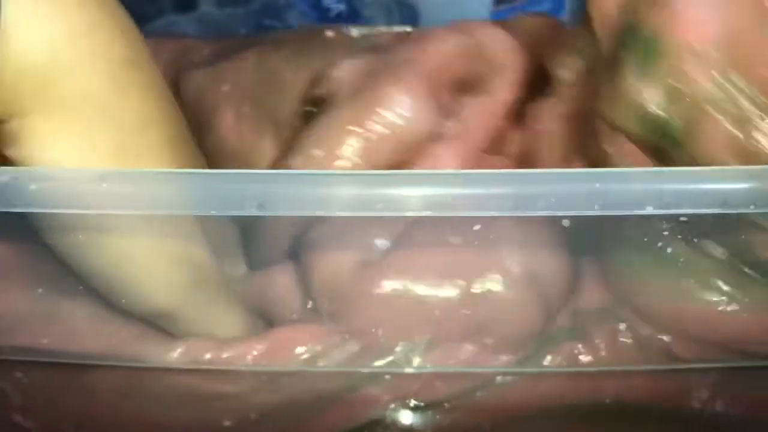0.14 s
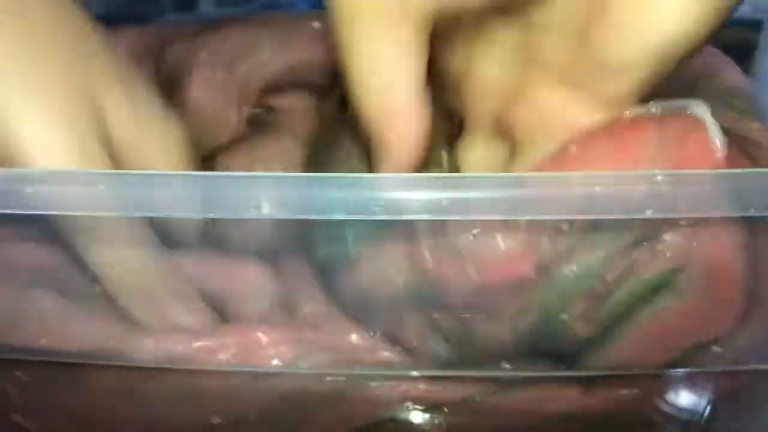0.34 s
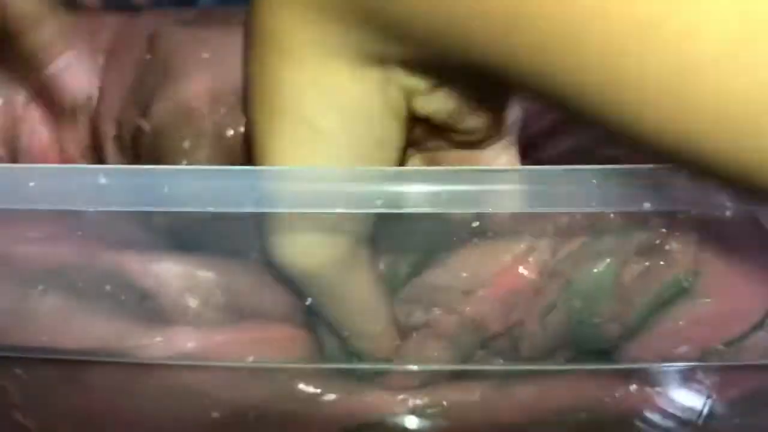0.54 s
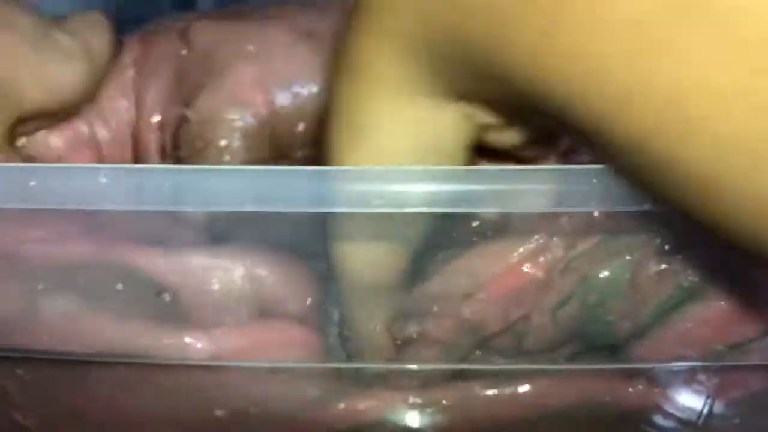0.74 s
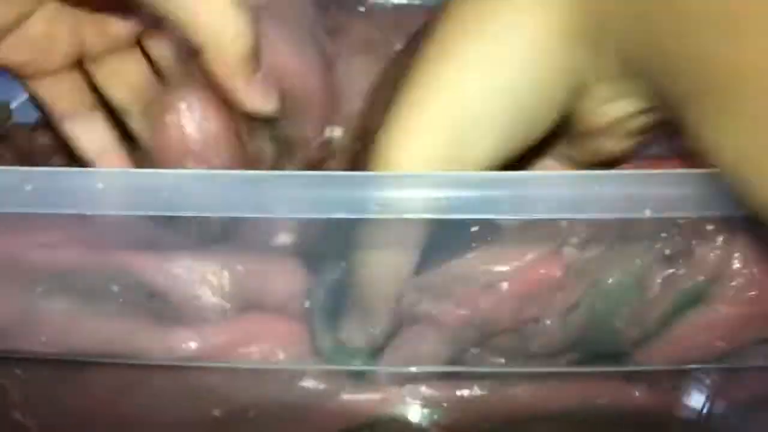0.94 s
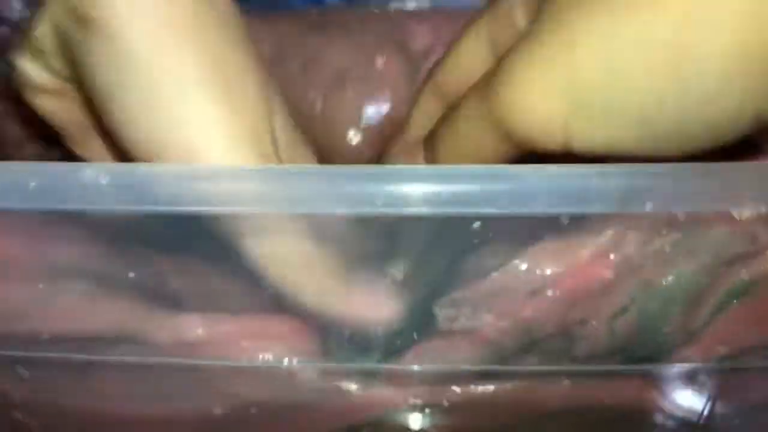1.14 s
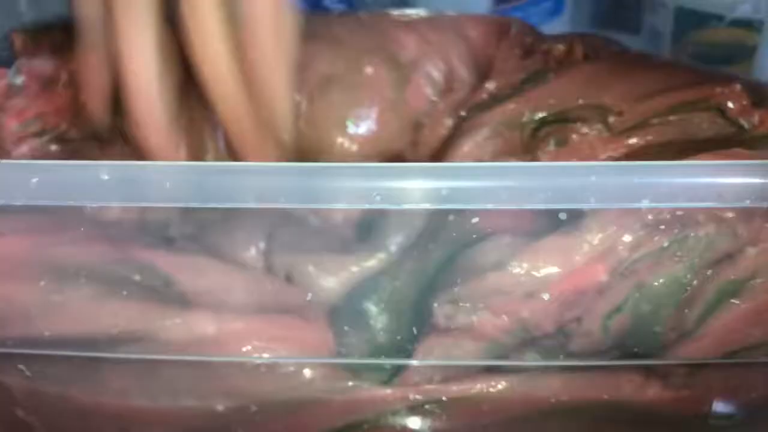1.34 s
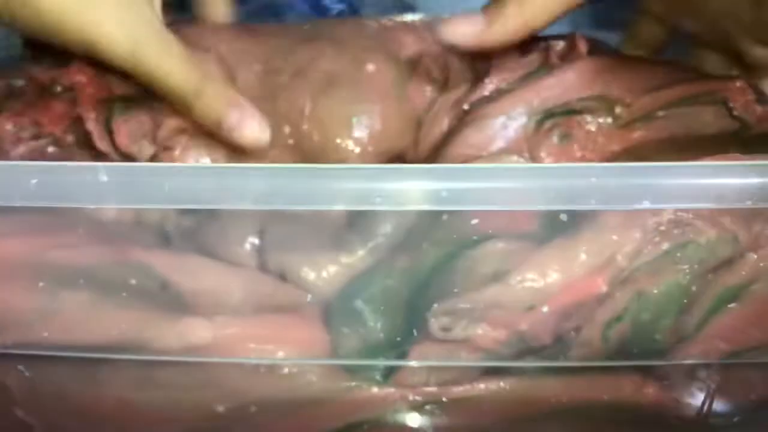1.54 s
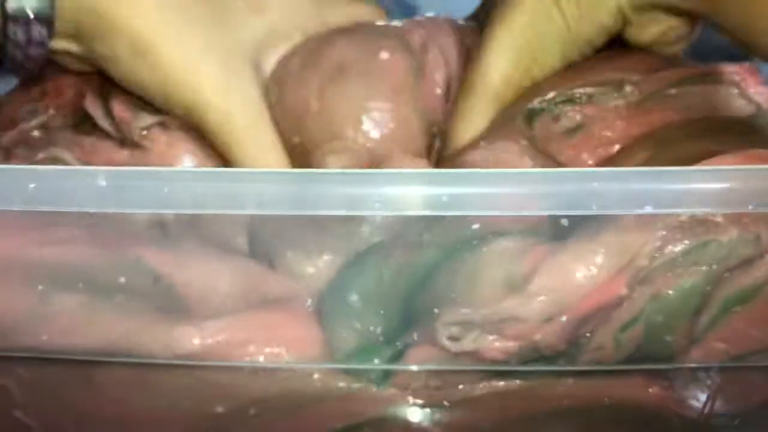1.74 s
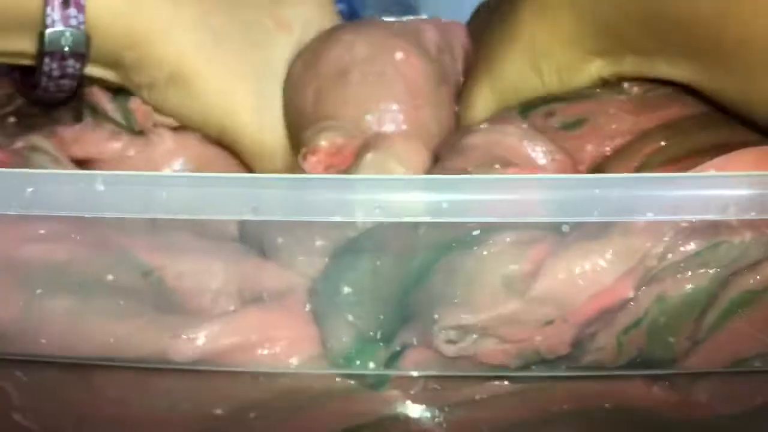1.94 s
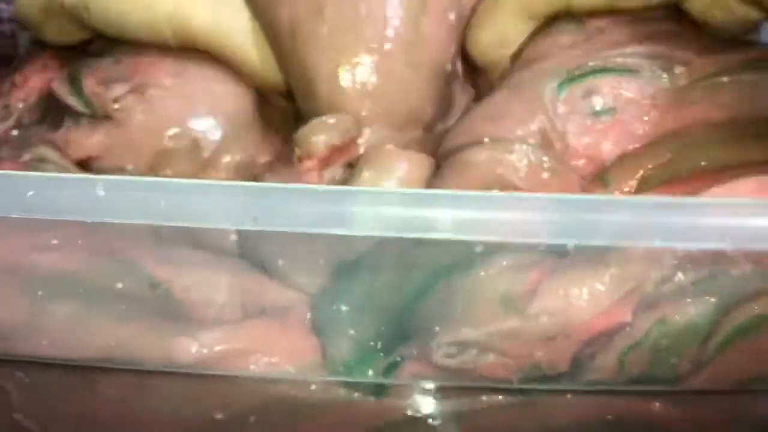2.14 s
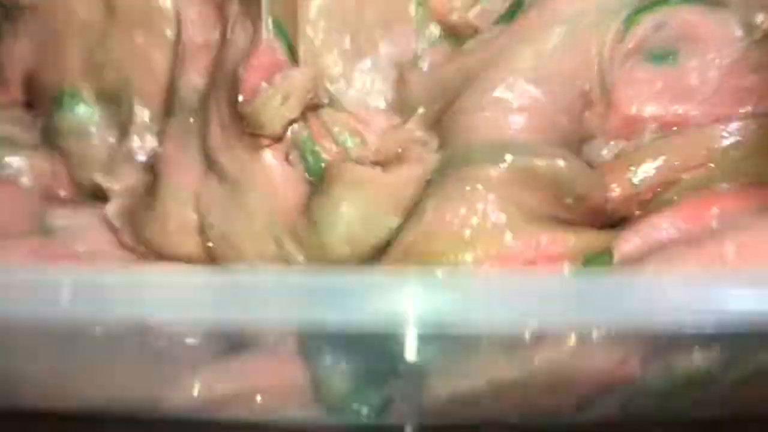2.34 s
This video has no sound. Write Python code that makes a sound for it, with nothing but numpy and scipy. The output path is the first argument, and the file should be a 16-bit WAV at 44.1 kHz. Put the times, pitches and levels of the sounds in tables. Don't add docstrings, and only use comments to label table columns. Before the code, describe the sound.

Wet slime squelches and crackles as hands knead it in a plastic tub, with sharp pops

```python
import sys
import numpy as np
from scipy import signal
from scipy.fft import rfft, irfft
from scipy.io import wavfile
from scipy.ndimage import uniform_filter1d

SR = 44100
rng = np.random.default_rng(int(sys.argv[2]) if len(sys.argv) > 2 else 0)


def master(y):
    cut = np.clip(np.atleast_2d(y).T, -1, 1)
    pcm = np.round(cut * 32767)
    wavfile.write(sys.argv[1], SR, pcm.astype(np.int16))


def decibels_to_gain(level_db):
    exponent = np.asarray(level_db, float) / 20
    return 10 ** exponent


N = 105840


def unit(x):
    return x / np.sqrt(np.mean(x ** 2))


def band(x, hz, width_hz):
    return signal.lfilter(*signal.iirpeak(min(hz, 0.45 * SR), hz / width_hz, fs=SR), x)


def shape_db(table, hz):
    table_hz, table_db = np.array(table).T
    return np.interp(np.log(hz), np.log(table_hz), table_db)


def walk(rate):
    hold = int(SR / rate)
    steps = np.repeat(rng.standard_normal(N // hold + 1), hold)
    smooth = uniform_filter1d(uniform_filter1d(steps, hold), hold)
    return unit(smooth[:N])


def add(out, s, sound):
    i = int(s * SR)
    out[i:i + len(sound)] += sound[:N - i]


# (frequency [Hz], level [dB])
ROOM_TONE = [(18, -60), (30, -35), (170, -2.5), (233, -2), (889, -8), (1190, -18.5), (2540, -20),
             (6900, -22), (16000, -31)]
# (time [s], level [dB])
SHUDDER = [(0, -49.5), (.08, -57.5), (.13, -68), (.33, -62.5), (.4, -74), (.45, -56), (.6, -61.5),
           (.77, -66), (1.18, -64.5), (1.29, -63), (1.46, -58.5), (1.64, -72.5), (1.69, -60), (1.8, -68),
           (2.08, -74.5), (2.13, -60), (2.31, -76)]
ROOM_TONE_DB = -64
SHUDDER_HZ = 117.8


def air():
    hz = np.maximum(np.arange(N // 2 + 1) * SR / N, 1)
    spectrum = rfft(rng.standard_normal(N)) * decibels_to_gain(shape_db(ROOM_TONE, hz))
    tone = unit(irfft(spectrum, N)) * decibels_to_gain(ROOM_TONE_DB + walk(9.4))
    shudder = band(band(rng.standard_normal(N), SHUDDER_HZ, 40), SHUDDER_HZ, 67)
    level_db = np.interp(np.arange(N) / SR, *np.array(SHUDDER).T)
    return tone + unit(shudder) * decibels_to_gain(level_db)


# (start [s], length [s], crackle level [dB], hollow level [dB])
SQUEEZES = [(0, 0.054, -52.5, -50.5), (0.092, 0.23, -52.5, -61.5), (0.18, 0.11, -48.5, -54.5),
            (0.384, 0.042, -44.5, -49.5), (0.417, 0.05, -36.5, -44), (0.478, 0.042, -68, -51.5),
            (.578, 0.022, -56, -60), (0.73, 0.18, -46, -58), (0.866, 0.037, -42, -48.5),
            (0.985, 0.13, -47.5, -57), (1.025, .12, -50, -47.5), (1.207, 0.049, -54, -50),
            (1.268, 0.043, -48, -46), (1.366, 0.023, -42.5, -39.5), (1.55, 0.091, -56.5, -63.5),
            (1.612, 0.039, -51.5, -52), (1.668, 0.079, -58, -65), (1.766, 0.081, -51, -56.5),
            (1.856, 0.032, -45.5, -61), (2.088, 0.088, -51.5, -54), (2.22, .105, -59, -53),
            (2.344, .035, -49, -63)]
ATTACK_S, RELEASE_S = 0.013, 0.011
SETTLE_DB, SETTLE_S = -40.5, 0.047


def effort(column):
    t, power = np.arange(N) / SR, np.zeros(N)
    for row in SQUEEZES:
        start, length = row[:2]
        attack = np.clip((t - start) / ATTACK_S, 0, 1) ** 3
        after = np.maximum(t - start - length, 0)
        release = np.exp(-after / RELEASE_S) + decibels_to_gain(SETTLE_DB) * np.exp(-after / SETTLE_S)
        power += decibels_to_gain(row[column]) ** 2 * attack * release
    return np.sqrt(power)


CRACKLES_PER_S, CRACKLE_SCATTER_DB, HISS_DB = 1300, 3.6, -3


def ticks(rate):
    chance, size, sign = rng.random((3, N))
    size = decibels_to_gain(-CRACKLE_SCATTER_DB * np.log(size + 0.06))
    hits = (chance < rate / SR) * size * np.sign(sign - 0.5)
    return unit(hits) + decibels_to_gain(HISS_DB) * rng.standard_normal(N)


# (frequency [Hz], level [dB])
SLIME = [(180, -37), (300, -19.5), (689, -12.5), (1140, 0), (3400, 0), (5080, -6), (6200, -1), (9090, -6.5),
         (16000, -1.5)]
FLUTTER_DB, CLUMP_DB = 2, 4


def crackle():
    broad, out = ticks(CRACKLES_PER_S / 3), 0
    for hz in 400 * 2 ** np.arange(0, 5.4, 0.5):
        clumps = decibels_to_gain(shape_db(SLIME, hz) + CLUMP_DB * walk(60))
        drive = 0.35 * broad + ticks(CRACKLES_PER_S / 4)
        out = out + clumps * band(band(drive, hz, hz / 2), hz, hz / 2)
    return unit(out) * effort(column=2) * decibels_to_gain(FLUTTER_DB * walk(120))


# (frequency [Hz], width [Hz], level [dB])
HOLLOW = [(638, 122, 7.5), (824, 460, -17), (524, 530, 2), (1120, 94, -17.5)]


def hollow():
    drive = ticks(CRACKLES_PER_S / 2)
    modes = sum(decibels_to_gain(db + FLUTTER_DB * walk(39.47)) * band(drive, hz, width) for hz, width, db in HOLLOW)
    return unit(modes) * effort(column=3)


# (time [s], pop level [dB], pitch [Hz], wall wave level [dB])
POPS_PULL = [(0.0213, -25, 1790, -29), (0.1267, -29, 4200, -64), (0.2249, -25, 2110, -30.5),
             (0.3383, -38.5, 2710, -77), (0.4525, -5, 7270, -65.5), (0.6673, -7.5, 4150, -24),
             (0.745, -24.5, 8350, -52), (0.8101, -24, 1720, -30), (1.0382, -18, 5830, -29.5),
             (1.072, -30, 3260, -24), (1.3444, -21.5, 3680, -21.5), (1.438, -62, 1480, -31.5),
             (1.5043, -17.5, 2700, -28), (1.5464, -18, 2300, -26.5), (1.5507, -24.5, 2770, -29),
             (1.555, -14.5, 2570, -31), (1.582, -19.5, 7700, -45), (1.6011, -31, 2470, -42),
             (1.6848, -39, 2170, -36.5), (1.7796, -17.5, 11300, -34), (1.792, -28, 1210, -32.5),
             (1.93, -24.5, 6500, -46), (2.0605, -34, 8040, -65)]
SNAP_DB, SNAP_TAIL_DB, RING_CYCLES = -5, -9.5, 1.4
WAVE_HZ, WAVE_BEND_S, WAVE_FADE_S = 3800, 0.00045, 0.0028
WAVE_DB, WAVE_ROUGH_DB = -2.5, 3.5


def snaps():
    out, t = np.zeros(N), np.arange(1500) / SR
    for s, db, hz, wall_db in POPS_PULL:
        noise = rng.standard_normal(1500)
        uneven = unit(uniform_filter1d(uniform_filter1d(noise[::-1], size=50), size=50))
        turns = WAVE_HZ * (1 + 0.176 * noise[2]) * WAVE_BEND_S * np.log1p(t / WAVE_BEND_S)
        wave = np.sin(2 * np.pi * turns + 0.5 * uneven) * decibels_to_gain(WAVE_ROUGH_DB * uneven)
        wave *= np.minimum(t / 0.0012, 1) * np.exp(-t / WAVE_FADE_S)
        ring = np.sin(2 * np.pi * hz * t) * np.exp(-t * np.sqrt(hz * 4000) / RING_CYCLES)
        crack = band(noise, 7200, 7300)
        crack = 0.57 * crack / np.std(crack[:24])
        crack *= decibels_to_gain(SNAP_DB) * np.exp(-t / 0.00053) + decibels_to_gain(SNAP_TAIL_DB) * np.exp(-t / 0.00096)
        pop = np.minimum(t / 0.0001, 1) * decibels_to_gain(db) * (ring + crack)
        add(out, s, pop + decibels_to_gain(wall_db + WAVE_DB) * wave)
    return out


# (time [s], pop level [dB], pitch [Hz], hollow level [dB])
POPS_BURIED = [(0.0379, -38.5, 2490, -39), (0.1849, -35, 11200, -50), (0.1935, -36, 14800, -51),
               (0.2042, -30, 7050, -43), (0.2103, -27.5, 9750, -44.5), (0.2464, -36, 9900, -39),
               (0.2615, -37, 3200, -52), (0.2975, -43.5, 2680, -55), (0.3959, -36, 14500, -50),
               (0.416, -35, 3930, -45), (0.4318, -22, 3360, -31.5), (0.4562, -18, 2890, -38.5),
               (0.4573, -15.5, 4050, -60), (0.4613, -20.5, 4000, -35), (0.4644, -20, 9900, -29),
               (0.4717, -19.5, 11700, -25), (0.759, -32, 6300, -38), (0.775, -25.5, 4680, -35.5),
               (0.7956, -31, 3700, -58), (0.82, -32.5, 4200, -27.5), (0.8687, -35, 6150, -41),
               (0.8836, -24, 3420, -27.5), (0.8877, -26, 11900, -44),
               (0.8934, -23, 6290, -55), (0.8961, -25.5, 3200, -40), (0.9085, -25, 15000, -41),
              (1.0049, -36, 2500, -38), (1.0486, -26, 7760, -33), (1.051, -23, 6350, -29.5),
              (1.0561, -34, 3320, -49), (1.257, -29, 7190, -39), (1.2798, -36, 9400, -38),
              (1.2916, -33, 13000, -57), (1.2953, -32.5, 10900, -54), (1.3085, -31, 3270, -38),
              (1.3903, -27.5, 12900, -28), (1.3939, -23, 3930, -32), (1.643, -34.5, 7900, -44),
              (1.8098, -30.5, 4860, -47), (1.823, -32.5, 8600, -40), (1.8292, -42, 3860, -31.5),
              (1.8324, -30.5, 5170, -62), (1.877, -34.5, 4020, -34.5), (1.89, -39.5, 6900, -39.5),
              (2.123, -41, 2540, -43.5), (2.1288, -35.5, 13000, -58), (2.3615, -42, 3700, -63),
               (.0985, -48, 4000, -60), (0.109, -46, 2450, -55), (0.1478, -51, 3500, -60),
              (.159, -39.5, 2980, -55), (.161, -41, 1490, -50), (0.1707, -43, 5000, -60),
              (.177, -45, 4000, -64), (.184, -46, 3400, -60), (.2095, -36, 2400, -55),
              (.253, -38, 1300, -53), (.291, -42, 2750, -60), (.3975, -36.5, 3600, -53),
              (.3995, -42, 7240, -50), (0.423, -34, 7200, -57), (0.435, -32, 6800, -55),
              (.437, -35, 11000, -55), (.4645, -22, 8060, -55), (0.466, -28.5, 4170, -55),
              (.479, -30, 2800, -37), (.516, -42, 6900, -65), (1.229, -42, 4230, -60),
              (1.244, -44, 4000, -60), (1.385, -30.5, 4070, -40), (1.3855, -41, 6100, -50),
              (1.389, -33, 4360, -47), (1.3951, -19.5, 2930, -33), (1.3945, -34, 6070, -55),
              (1.403, -32.5, 3470, -48), (1.5039, -24, 4120, -62), (2.0982, -56, 3300, -64),
              (2.156, -43.5, 2350, -57), (2.231, -44, 1820, -52), (1.793, -31, 2330, -39),
              (2.067, -51.5, 2500, -70), (2.023, -52, 2500, -70), (.657, -50, 3200, -70),
              (.644, -57, 3620, -70), (0.4524, -19, 3600, -55), (2.356, -44, 3600, -65),
              (2.366, -50, 5600, -65), (2.377, -48, 2650, -67)]
POP_RISE_S, SPIT_S, SPIT_DB, HOLLOW_RING_DB = 0.0005, 0.0013, -0.5, -10


def pops():
    out, knock, t = np.zeros(N), np.zeros(N), np.arange(600) / SR
    swell = t / POP_RISE_S * np.exp(1 - t / POP_RISE_S)
    for s, db, hz, hollow_db in POPS_BURIED:
        noise = rng.standard_normal(600)
        spit = unit(band(noise, hz, 0.8 * hz) + decibels_to_gain(-20) * noise) * np.sqrt(swell) * np.exp(-t / SPIT_S)
        ring = np.sin(2 * np.pi * hz * t + 3 * noise[0]) * swell
        add(out, s - POP_RISE_S / 2, decibels_to_gain(db) * (ring + decibels_to_gain(SPIT_DB) * spit))
        add(knock, s, decibels_to_gain(hollow_db + HOLLOW_RING_DB) * np.sign(noise[:1]))
    for hz, width, db in HOLLOW:
        out += decibels_to_gain(db) * band(knock, hz, width) * SR / (2 * np.pi * width)
    return out


# (time [s], level [dB], pitch [Hz], decay [s])
BUMPS = [(.04, -35, 349, 0.0052), (0.1485, -31.5, 677, 0.0032), (.4, -35, 830, 0.0053),
         (.4318, -20.5, 1230, 0.0021), (.475, -26, 820, 0.0055), (1.5046, -20, 1190, 0.0011),
         (1.38, -33.5, 690, .005), (1.781, -32, 900, 0.0018), (1.686, -38, 257, 0.0052),
         (.669, -30, 600, 0.0022), (1.308, -31, 1020, 0.0026), (2.287, -45, 960, .004),
         (2.303, -45, 1270, .004), (2.318, -45, 1400, 0.0054), (1.0735, -30, 620, 0.003),
         (1.215, -36, 320, 0.0026), (1.219, -15, 178, 0.0022), (1.239, -31, 134, 0.0069),
         (1.793, -24, 850, 0.0017), (1.395, -21.5, 686, 0.0049), (.466, -26, 849, 0.0054),
         (2.13, -31.5, 696, 0.0039), (2.24, -37, 830, 0.0081), (2.242, -43.5, 306, 0.013)]
BUMP_SAG = 1.3


def bumps():
    out, t = np.zeros(N), np.arange(8000) / SR
    for s, db, hz, decay in BUMPS:
        ring = np.sin(2 * np.pi * hz * np.log1p(BUMP_SAG * t) / BUMP_SAG)
        add(out, s, decibels_to_gain(db) * ring * np.minimum(t * hz * 3.3, 1) * np.exp(-t / decay))
    return out


def tail(t60, db, gap):
    t = np.arange(SR // 2) / SR
    h = rng.standard_normal(len(t)) * decibels_to_gain(-60 * t / t60) * (t > gap)
    return decibels_to_gain(db) * h / np.sqrt(np.sum(h ** 2))


# (frequency [Hz], width [Hz], level [dB])
MIC = [(3700, 1330, 3), (5180, 1500, -4.5), (8820, 600, -4.5)]
LOW_CUT_HZ = 108


def scene():
    room_air = air()
    near = crackle() + hollow() + snaps() + pops() + bumps()
    tub = tail(t60=0.069, db=-18.5, gap=0.0011)
    room = tail(t60=0.12, db=-19, gap=0.0079)
    near = near + signal.fftconvolve(near, tub + room)[:N]
    for hz, width, db in MIC:
        near = near + (decibels_to_gain(db) - 1) * band(near, hz, width)
    low_cut = signal.butter(3, LOW_CUT_HZ, "high", fs=SR, output="sos")
    return (signal.sosfilt(low_cut, near) + room_air)[None]


def roll_off(x):
    return signal.sosfilt(signal.butter(12, 17100, fs=SR, output="sos"), x)


def record(dry):
    top_cut = signal.ellip(5, 0.5, 26, 15900, fs=SR, output="sos")
    mix = signal.sosfilt(top_cut, dry)
    return roll_off(mix)


dry = scene()
out = record(dry)
master(out)
```